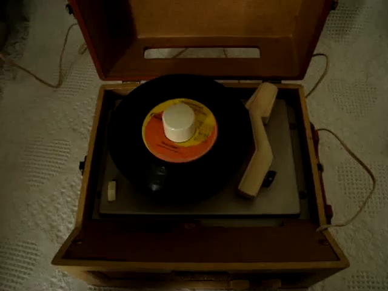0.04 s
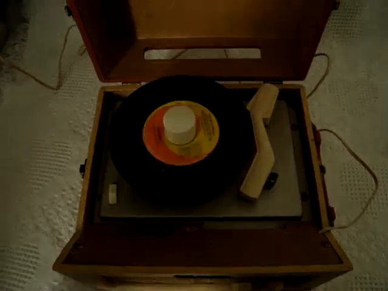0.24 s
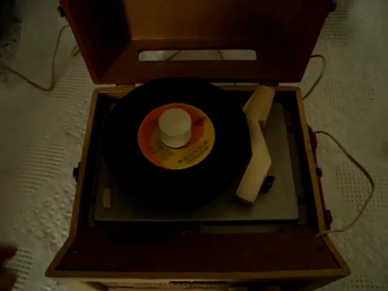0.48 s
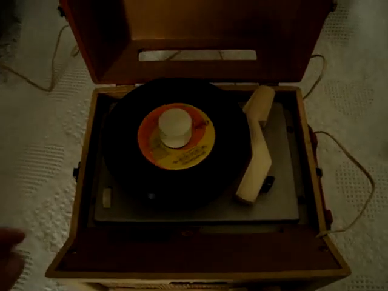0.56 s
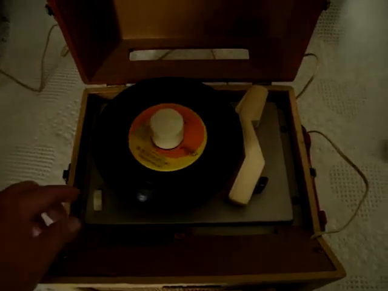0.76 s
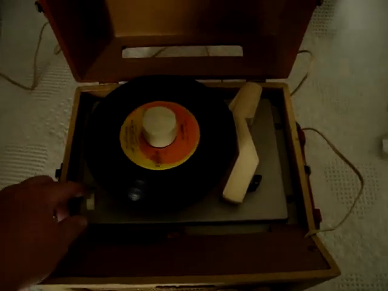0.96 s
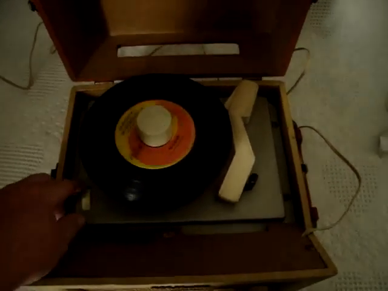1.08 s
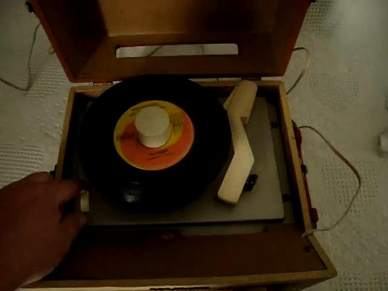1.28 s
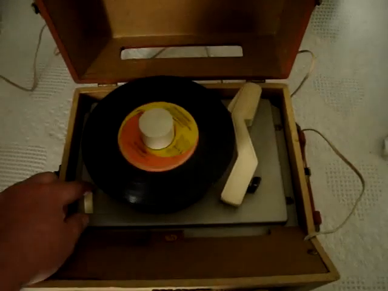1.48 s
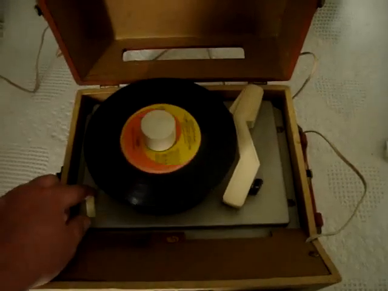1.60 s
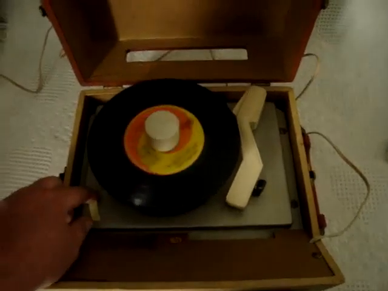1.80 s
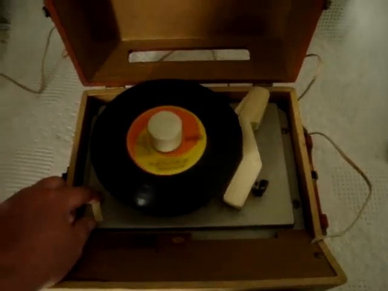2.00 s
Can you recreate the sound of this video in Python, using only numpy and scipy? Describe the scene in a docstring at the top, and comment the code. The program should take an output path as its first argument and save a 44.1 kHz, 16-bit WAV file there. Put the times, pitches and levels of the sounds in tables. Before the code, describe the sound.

Close, mono sound of an old turntable motor indoors: wavering hum, thin whine and rough rolling rumble pulsing about eleven times a second, sharp clattering clicks in the first half, rubbing scuffs and a tiny late squeak.

```python
"""The motor of a portable record player hums in a small room, heard from close above the open case.
The hum is a set of wavering tones, with a thin whine on top and a faint hiss of coloured noise.
The rubber drive wheel rumbles through the deck as shaped noise, thumps once a turn and often scuffs.
A few sharp clicks of the mechanism ring the deck as fading tones; a pop comes with the first click.
Near the end there is one short falling squeak."""
import sys
import numpy as np
from scipy import signal
from scipy.fft import rfft, irfft
from scipy.io import wavfile
from scipy.ndimage import uniform_filter1d

SR = 44100
rng = np.random.default_rng(int(sys.argv[2]) if len(sys.argv) > 2 else 0)


def unload_audio(sound):
    """Save the sound as a 16-bit wav file, at the path given as the first command line argument."""
    columns = np.transpose(np.atleast_2d(sound))
    # keep every value between -1 and 1, then stretch to whole-number steps
    steps = np.round(np.clip(columns, -1, 1) * 32767)
    wavfile.write(sys.argv[1], SR, steps.astype(np.int16))


N = 90228
T = np.arange(N) / SR  # time of each sample, s

WHEEL_HZ = 11.02  # turns of the drive wheel per second
BUMP_S = 0.058  # when the wheel's uneven spot first comes round


def undb(db):
    """Turn decibels into a gain."""
    return 10 ** (np.asarray(db) / 20)


def unit(x):
    """Scale to an average strength (rms) of 1."""
    return x / np.sqrt(np.mean(x ** 2))


def walk(rate):
    """Smooth random wandering, about `rate` new values a second, rms 1."""
    step = int(SR / rate)
    stairs = np.repeat(rng.standard_normal(N // step + 1), step)
    smooth = uniform_filter1d(uniform_filter1d(stairs, step), step)
    return unit(smooth[:N])


def follow(points):
    """Join (time, level) points with straight lines."""
    return np.interp(T, *np.array(points).T)


def colour(x, points, resonances=()):
    """Shape a sound by a spectrum with resonances on top of it; rms 1."""
    f = np.fft.rfftfreq(N, 1 / SR)
    hz, db = np.array(points, float).T
    curve = np.interp(np.log(f + 1), np.log(hz), db)
    for centre, width, lift in resonances:
        curve = curve + lift / (1 + (2 * (f - centre) / width) ** 2)
    return unit(irfft(rfft(x) * undb(curve), N))


def line(hz, drift):
    """A tone of rms 1 whose pitch drifts slightly around hz."""
    pitch = hz * (1 + drift * walk(6.35))
    cycles = np.cumsum(pitch) / SR + rng.random()
    return np.sqrt(2) * np.sin(2 * np.pi * cycles)


# Tones of the motor hum, before waver and swell: f/Hz, level/dB
HUM_LINES = [(120, -57.3), (240, -52.3), (392, -59), (480, -61), (540, -60), (660, -62), (840, -60),
             (1146.5, -60.5)]
# Slow swell of the lowest hum tones: t/s, level/dB
HUM_SWELL = [(.16, -.5), (.85, -2.5), (1.15, 1.5), (1.5, -1.5), (1.64, 4.5), (1.8, -1), (2.04, 2.5)]
HUM_LOW_HZ = 300  # only tones below this swell
HUM_WAVER_DB, HUM_DRIFT = 0.8, 0.0004  # rms level waver; rms pitch drift as a fraction


def motor():
    """Mains-driven hum: tones that each waver a little in level, the lowest also swelling slowly."""
    swell = follow(HUM_SWELL)
    hum = np.zeros(N)
    for hz, db in HUM_LINES:
        level = db + swell * (hz < HUM_LOW_HZ) + HUM_WAVER_DB * walk(8.1)
        hum += undb(level) * line(hz, HUM_DRIFT)
    return hum


WHINE_HZ, WHINE_DB, WHINE_DRIFT = 8122, -66, 0.0003  # drift: rms, as a fraction


def whine():
    """One thin high tone of constant level that drifts very slightly in pitch."""
    return undb(WHINE_DB) * line(WHINE_HZ, WHINE_DRIFT)


# Relative spectrum of noise heard through the deck: f/Hz, level/dB (per Hz)
RUMBLE = [(60, -44), (110, -7.5), (150, -2.5), (195, 1.5), (245, -3), (310, 0), (640, -2), (700, -8),
          (810, -1.5), (1170, -5), (1270, -13.5), (1450, -8.5), (1850, -22), (3200, -16), (4200, -30),
          (9000, -58.5)]
# Resonances of deck and case: f/Hz, width/Hz, lift level/dB
DECK = [(315.8, 9.3, 11), (376.5, 28, 6), (511.5, 41, 5.5), (613, 34, 6.5), (837, 15, 1), (1980, 135, 8.5),
        (2526, 224, 6), (2730, 52, 3.5), (3106, 68, 8.5), (4700, 73, 11)]
# Rolling noise before swell and flicker: t/s, level/dB
ROLL = [(.16, -45.5), (.6, -44.5), (1.0, -43), (1.4, -45.5), (1.7, -43), (2.04, -43.5)]
REPEAT_SHARE = 0.25  # part of the roughness power that repeats each turn
SWELL_DB, SWELL_LAG_S = 1.5, 0.023  # the swell peaks this long after the uneven spot
FLICKER_DB = 2.5  # rms


def rolling():
    """The rim's roughness, partly the same on each turn, shakes the deck and swells once a turn."""
    rim = np.resize(rng.standard_normal(int(SR / WHEEL_HZ)), N)
    fresh = rng.standard_normal(N)
    push = np.sqrt(REPEAT_SHARE) * rim + np.sqrt(1 - REPEAT_SHARE) * fresh
    swell = SWELL_DB * np.cos(2 * np.pi * WHEEL_HZ * (T - BUMP_S - SWELL_LAG_S))
    level = follow(ROLL) + swell + FLICKER_DB * walk(40.06)
    return colour(push, RUMBLE, DECK) * undb(level)


HISS_DB = -55
# Relative spectrum of the hiss: f/Hz, level/dB (per Hz)
HISS = [(25, 1.5), (45, 2), (65, 12), (100, 1), (200, 0), (3000, 2), (5000, -1), (8200, -4), (9000, -7),
        (10000, -14)]


def hiss():
    """A faint steady hiss: random noise shaped by a spectrum."""
    return undb(HISS_DB) * colour(rng.standard_normal(N), HISS)


RING_SCATTER_DB = 1.1  # rms change of each tone's level from blow to blow


def ring(age, modes, pitch, tilt_db):
    """Struck tones, shifted in pitch and tilted in dB per octave; each blow weights them anew."""
    scatter = RING_SCATTER_DB * rng.standard_normal(len(modes))
    out = np.zeros(N)
    for k, (hz, db, t60) in enumerate(modes):
        octaves = np.log2(hz / modes[0][0])
        gain = (-1) ** k * undb(db + scatter[k] + tilt_db * octaves)  # signs alternate
        fade = np.exp(-np.log(1000) * age / t60)
        out += gain * fade * np.sin(2 * np.pi * hz * pitch * age)
    return out


# Clicks of the mechanism: t/s, ring level/dB, snap level/dB, deck pitch factor, lever pitch factor,
# snap tilt/(dB per octave), chatter level/dB
CLICKS = [(.1423, -32, -24, 0.93, 0.96, 0.5, -31.5), (0.1436, -39, -28.5, 1.1, 1.02, -3, -33),
          (0.4244, -43, -33.5, 1.02, 1.18, -4.5, -45), (0.4344, -39, -64, 1.1, 1.1, -9, -31),
          (0.44, -28.5, -28.5, 0.94, 0.968, 0.2, -29), (0.4487, -28, -50, .94, 1, -12, -34),
          (0.5074, -33.5, -41, .9, 1, -2.5, -36.5), (0.528, -35.5, -58, .8, 1, -6, -42),
          (.5355, -34, -57, 0.89, 0.65, -9, -32), (.5432, -27.5, -31, .68, 1.3, -3.5, -28),
          (0.5438, -22, -35.5, 1, 1.048, -1.5, -27.5), (.5470, -32.5, -48, 1.02, 1.2, 1, -37),
          (.5510, -37, -59, 0.88, 1, -6, -42), (.737, -36.5, -58, 0.77, 1, -2, -40.5),
          (1.2111, -33.5, -63, 0.89, 0.84, -2, -37.5)]
# Tones of the deck before the pitch factor: f/Hz, level/dB (added to the ring level), 60 dB fade/s
DECK_MODES = [(374, -16, 0.041), (687, -5, 0.022), (964, -5, 0.021), (1269, -4, 0.039), (1477, -4.5, 0.045),
              (1637, -1, .025), (1976, -4, .014), (2360, -13.5, 0.0074), (3270, -11.5, 0.01)]
# Tones of the lever before pitch and tilt: f/Hz, level/dB (added to the snap level), 60 dB fade/s
LEVER_MODES = [(1580, 0.5, .015), (2236, -1.5, .015), (2560, -0.5, 0.017), (3710, -8.5, .008),
               (4430, 1, 0.011), (4920, -3, 0.0074), (5370, -10, 0.0079), (6470, -1, 0.0084),
               (7310, -3, 0.012), (8330, -8, 0.0079), (8800, -10, 0.0099)]
# Relative spectrum of the grit in the snap: f/Hz, level/dB (per Hz)
SNAP_GRIT = [(200, 2), (1500, -1.5), (2500, 2.5), (3300, 5.5), (4400, 5), (5500, -0.5), (6700, 1),
             (8800, -7), (10000, -31.5)]
# Relative spectrum of the chattering loose parts: f/Hz, level/dB (per Hz)
CHATTER = [(200, -7), (400, -12), (1000, 1.5), (1700, 5.5), (2100, -9), (3000, -11.5), (4000, -28),
           (10000, -45)]
# Relative spectrum of the room tail: f/Hz, level/dB (per Hz)
ROOM = [(200, 11), (1600, 2), (4000, -30), (10000, -17)]
SNAP_GRIT_DB, SNAP_DECAY_S = -1, 0.0017  # level is added to the snap level
THUD_HZ, THUD_DECAY_S, THUD_DB = 410, 0.00095, -1.5  # push of the case; level added to the snap level
CHATTER_DECAY_S = 0.0031
CLICK_LOW_HZ = 163  # low cut for the clicks
ROOM_DB, ROOM_T60_S = -23.5, 0.19  # tail level relative to the clicks; 60 dB fade time


def clicks():
    """A lever snaps, the case thuds, the deck rings and loose parts chatter, with a brief room tail."""
    out = np.zeros(N)
    grit = colour(rng.standard_normal(N), SNAP_GRIT)
    loose = colour(rng.standard_normal(N), CHATTER)
    for start, ring_db, snap_db, deck_pitch, lever_pitch, tilt_db, chatter_db in CLICKS:
        age = np.maximum(T - start, 0)
        deck = undb(ring_db) * ring(age, DECK_MODES, deck_pitch, 0)
        chatter = undb(chatter_db) * loose * np.exp(-age / CHATTER_DECAY_S)
        lever = ring(age, LEVER_MODES, lever_pitch, tilt_db)
        snap = lever + undb(SNAP_GRIT_DB) * grit * np.exp(-age / SNAP_DECAY_S)
        thud = undb(THUD_DB) * np.exp(-age / THUD_DECAY_S) * np.sin(2 * np.pi * THUD_HZ * age)
        out += (T >= start) * (deck + chatter + undb(snap_db) * (snap + thud))
    low_cut = signal.butter(2, CLICK_LOW_HZ, "highpass", fs=SR, output="sos")
    out = signal.sosfilt(low_cut, out)
    room = colour(rng.standard_normal(N), ROOM) * np.exp(-np.log(1000) * T / ROOM_T60_S)
    room = room / np.sqrt(np.sum(room ** 2))
    return out + undb(ROOM_DB) * signal.fftconvolve(out, room)[:N]


POP_S, POP_HZ, POP_DECAY_S, POP_DB = 0.1423, 180, 0.0012, -24


def pop():
    """A single low, heavily damped pop under the first click."""
    age = np.maximum(T - POP_S, 0)
    return undb(POP_DB) * np.exp(-age / POP_DECAY_S) * np.sin(2 * np.pi * POP_HZ * age)


SCUFF_ATTACK_S = 0.00087


def burst(start, hold, decay):
    """Loudness shape of a rubbing contact: quick rise, hold, release."""
    age = T - start
    rise = np.clip(age / SCUFF_ATTACK_S, 0, 1)
    return rise * np.exp(-np.maximum(age - SCUFF_ATTACK_S - hold, 0) / decay)


CRACKLE_PER_S, CRACKLE_SPREAD_DB = 900, 3.5  # average number of slips; rms spread of their sizes
CRACKLE_SHARE = 0.6  # part of the power in the slips
RASP_GRAIN = 0.38  # unevenness of the finer grain


def crackle():
    """Friction noise: sparse little slips of uneven size over a finer grain."""
    happens = rng.random(N) < CRACKLE_PER_S / SR
    direction = rng.choice([-1, 1], N)
    size = undb(CRACKLE_SPREAD_DB * rng.standard_normal(N))
    slips = happens * direction * size
    fine = rng.standard_normal(N) * np.exp(RASP_GRAIN * walk(1500))
    return np.sqrt(CRACKLE_SHARE) * unit(slips) + np.sqrt(1 - CRACKLE_SHARE) * unit(fine)


# Scuffs of the wheel: t/s, rasp level/dB, knock level/dB, catch level/dB (relative to the rasp),
# hold/s, decay/s
SCUFFS = [(.162, -40, -46, -14, .007, .008), (.252, -57, -43.5, -12, .012, .014),
          (.711, -48, -46, 1, .005, .012), (.8915, -47, -47, -4, .003, .007),
          (.962, -53, -42.5, -10, .02, .015), (1.069, -40, -42.5, -1, .008, .007),
          (1.145, -42, -34.5, -3, .006, .013), (1.253, -49, -43.5, -2, .007, .015),
          (1.328, -50, -46, -4, .002, .006), (1.433, -45, -47, 0, .004, .012),
          (1.513, -54, -41.5, -8, .012, .014), (1.620, -44, -48, 1, .004, .009),
          (1.694, -53, -40.5, -8, .005, .02), (1.794, -36.5, -38, 0, .012, .011),
          (1.875, -50, -43, -6, .005, .012), (1.952, -42.5, -46, 0, .006, .012),
          (1.971, -54, -42.5, -12, .016, .018)]
# Relative spectrum of the rasp before the deck resonances: f/Hz, level/dB (per Hz)
RASP = [(300, -10), (1500, -9.5), (2100, 2), (3600, 5.5), (4200, -3), (6000, -4.5), (7800, -5.5),
        (10000, -26.5)]
# Relative spectrum of the bright crackle as the wheel catches: f/Hz, level/dB (per Hz)
CATCH = [(500, -21), (3000, -11.5), (5500, -3.5), (7400, 4.5), (8200, -1), (9200, -10.5), (10000, -30)]
CATCH_DECAY_S, KNOCK_LAG_S = 0.0069, 0.0043


def scuffs():
    """Harder rubs: a bright catch and a grainy rasp start together, a dull deck knock just after."""
    catch = colour(crackle(), CATCH)
    rasp = colour(crackle(), RASP, DECK)
    knock = colour(rng.standard_normal(N), RUMBLE, DECK)
    out = np.zeros(N)
    for start, rasp_db, knock_db, catch_db, hold, decay in SCUFFS:
        catch_fade = (T >= start) * np.exp(-np.maximum(T - start, 0) / CATCH_DECAY_S)
        bright = undb(catch_db) * catch * catch_fade
        out += undb(rasp_db) * (bright + rasp * burst(start, hold, decay))
        out += undb(knock_db) * knock * burst(start + KNOCK_LAG_S, hold, decay)
    return out


def turns():
    """Times at which the wheel's uneven spot comes round."""
    return np.arange(BUMP_S, N / SR, 1 / WHEEL_HZ)


# Strength of the thump on successive turns: level/dB (rms of the tone at its peak)
THUMP_LEVELS = [-60, -60, -42, -49, -42, -43.5, -42, -49, -43, -52, -42, -49, -44, -46.5, -47, -46, -41.5,
                -45.5, -40, -49, -46, -46]
THUMP_HZ, THUMP_LAG_S, THUMP_WIDTH_S = 183, 0.031, 0.016
THUMP_PHASE_SCATTER = 0.55  # rms, radians
BRUSH_DB, BRUSH_SCATTER_DB = -51, 2.0  # middle level and rms change from turn to turn
BRUSH_LAG_S, BRUSH_HOLD_S, BRUSH_DECAY_S = 0.018, 0.0028, 0.0033
BRUSH_HZ, BRUSH_WIDTH_HZ = 2915, 270  # resonance of the light contact


def thumps():
    """Once a turn the case booms softly and the rim brushes the platter."""
    boom, contact = np.zeros(N), np.zeros(N)
    scatter = rng.standard_normal((len(THUMP_LEVELS), 2))
    for start, db, (phase, touch) in zip(turns(), THUMP_LEVELS, scatter):
        age = T - start - THUMP_LAG_S
        bump = np.exp(-0.5 * (age / THUMP_WIDTH_S) ** 2)
        tone = np.sin(2 * np.pi * THUMP_HZ * age + THUMP_PHASE_SCATTER * phase)
        boom += undb(db) * bump * tone
        brush_gain = undb(BRUSH_DB + BRUSH_SCATTER_DB * touch)
        contact += brush_gain * burst(start + BRUSH_LAG_S, BRUSH_HOLD_S, BRUSH_DECAY_S)
    slope = [(100, -3.0), (10000, -23.0)]  # f/Hz, level/dB
    brush = colour(rng.standard_normal(N), slope, [(BRUSH_HZ, BRUSH_WIDTH_HZ, 18)])
    return np.sqrt(2) * boom + contact * brush


SQUEAK_S, SQUEAK_WIDTH_S, SQUEAK_DB = 1.928, 0.0052, -37.5
SQUEAK_HZ, SQUEAK_FALL_HZ_PER_S = 890, 6500  # pitch at the loudest moment, and its fall


def squeak():
    """A brief rub that slides down in pitch."""
    age = T - SQUEAK_S
    phase = SQUEAK_HZ * age - 0.5 * SQUEAK_FALL_HZ_PER_S * age ** 2
    bump = np.exp(-0.5 * (age / SQUEAK_WIDTH_S) ** 2)
    return np.sqrt(2) * undb(SQUEAK_DB) * bump * np.sin(2 * np.pi * phase)


START_S, FADE_IN_S = 0.17, 0.038  # full level is reached at START_S, after a fade this long


def scene():
    """The running player fades in; scuffs, clicks, pop and squeak are added, in mono."""
    running = motor() + whine() + rolling() + thumps() + hiss()
    fade_in = np.clip(1 + (T - START_S) / FADE_IN_S, 0, 1)
    return (running * fade_in + scuffs() + clicks() + pop() + squeak())[None]


TOP_HZ = 10100


def record(dry):
    """Cut the treble steeply above TOP_HZ."""
    top_cut = signal.ellip(10, 0.2, 70, TOP_HZ, fs=SR, output="sos")
    return signal.sosfilt(top_cut, dry)


dry = scene()
out = record(dry)
unload_audio(out)
```